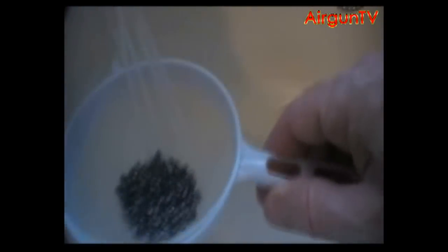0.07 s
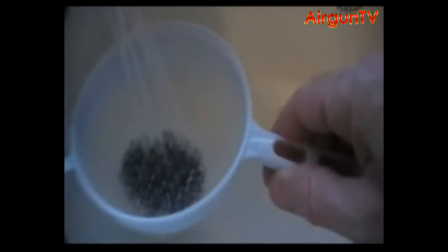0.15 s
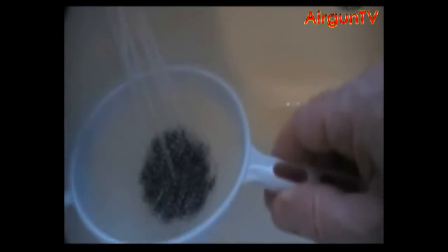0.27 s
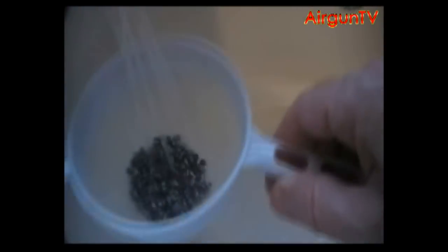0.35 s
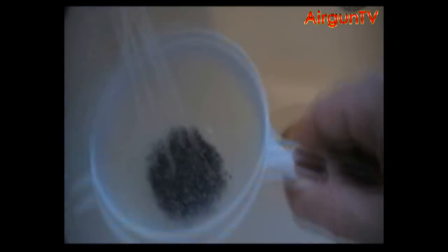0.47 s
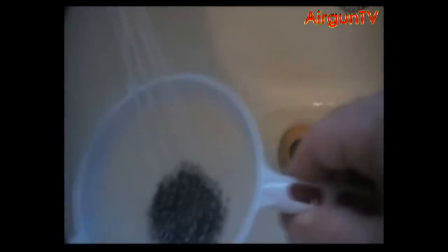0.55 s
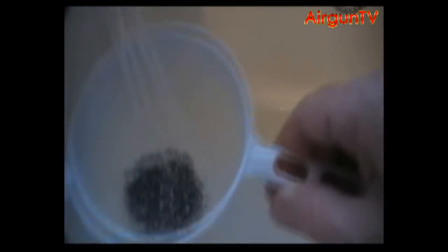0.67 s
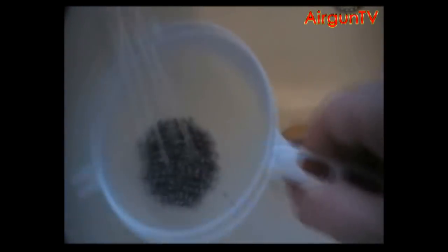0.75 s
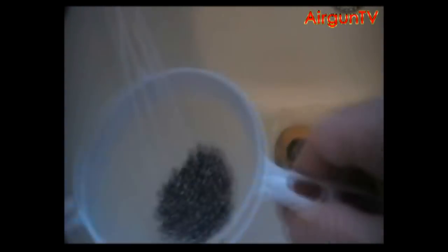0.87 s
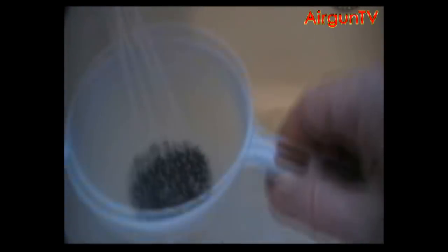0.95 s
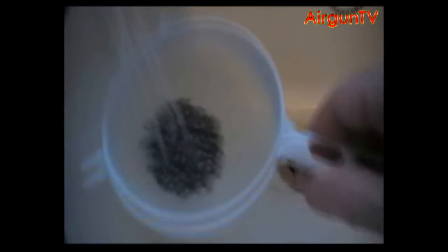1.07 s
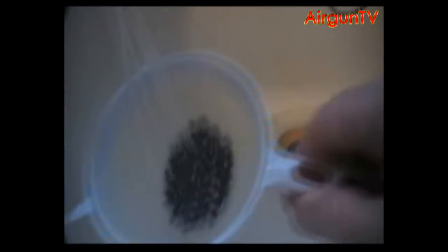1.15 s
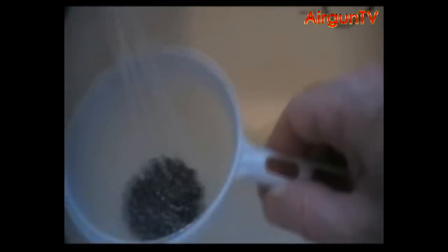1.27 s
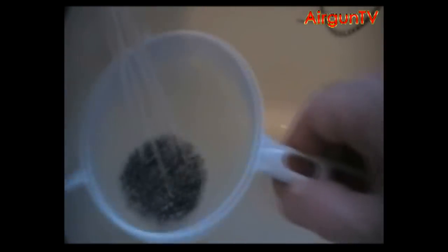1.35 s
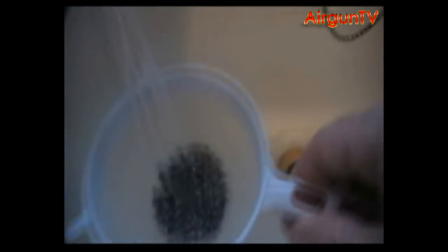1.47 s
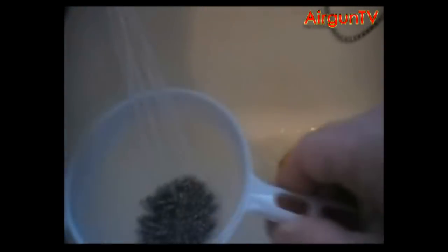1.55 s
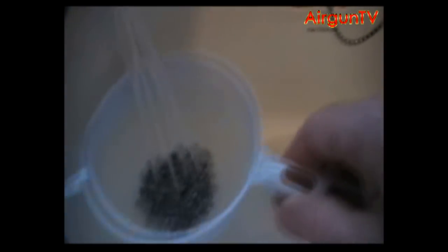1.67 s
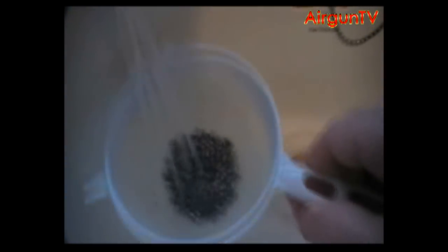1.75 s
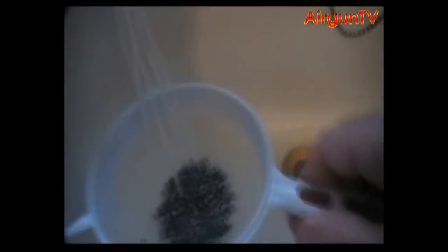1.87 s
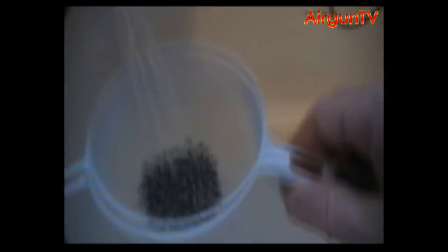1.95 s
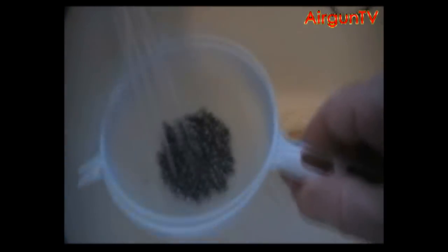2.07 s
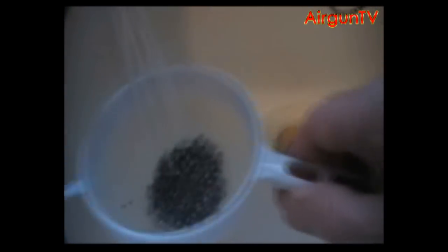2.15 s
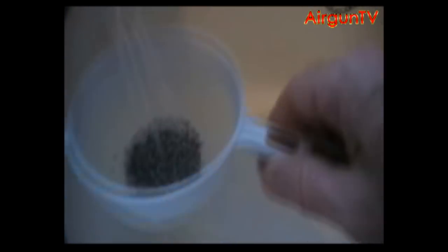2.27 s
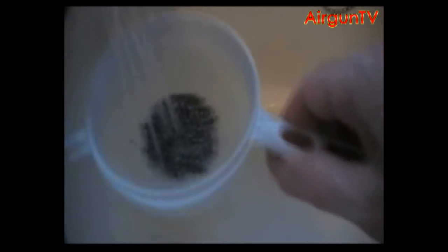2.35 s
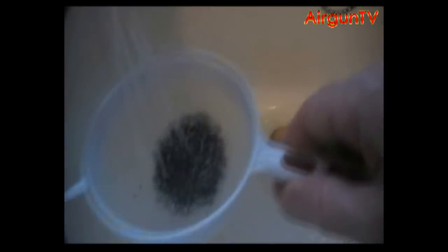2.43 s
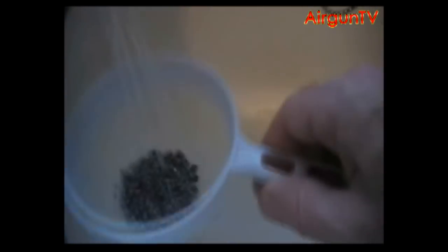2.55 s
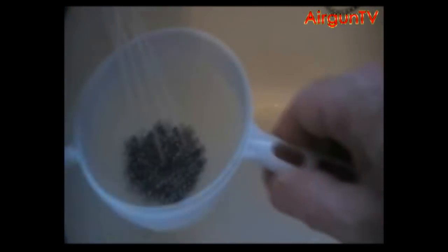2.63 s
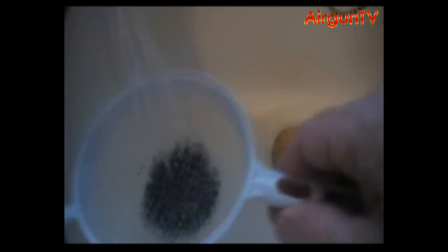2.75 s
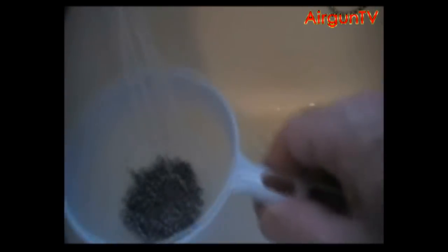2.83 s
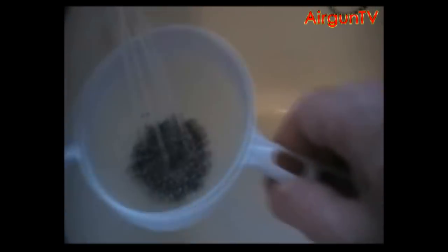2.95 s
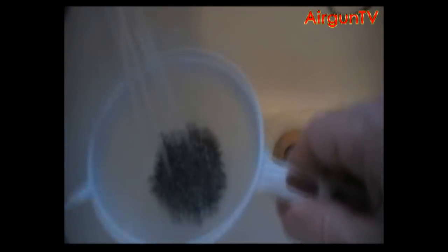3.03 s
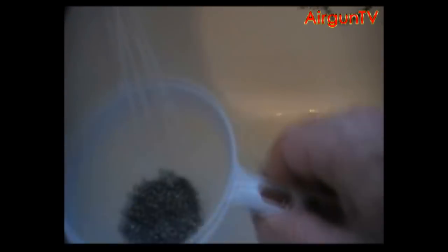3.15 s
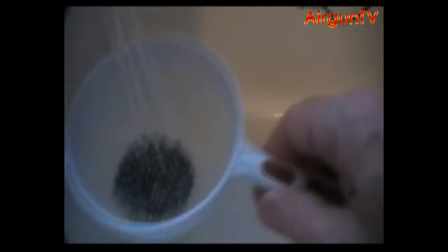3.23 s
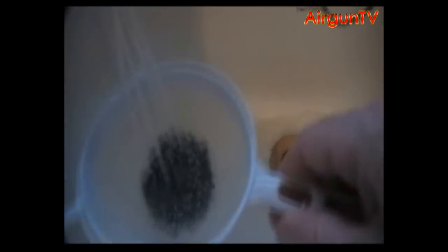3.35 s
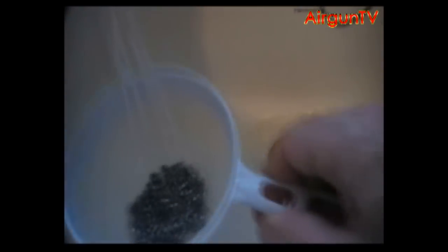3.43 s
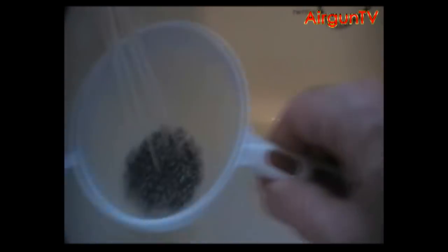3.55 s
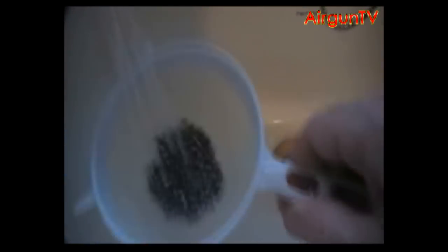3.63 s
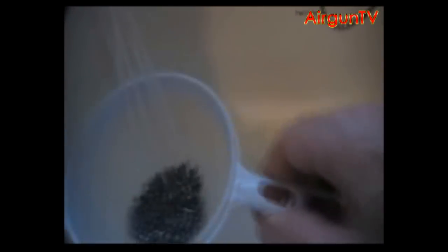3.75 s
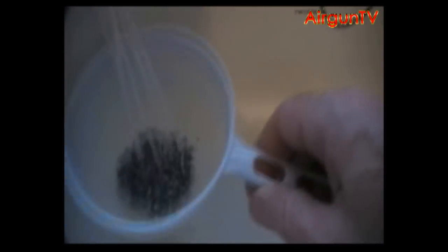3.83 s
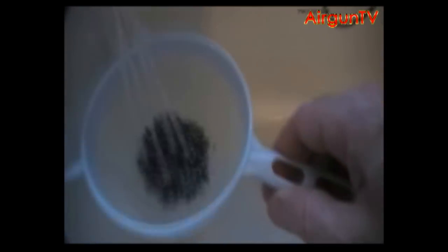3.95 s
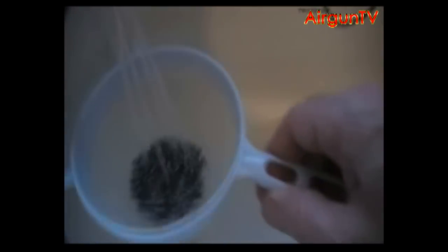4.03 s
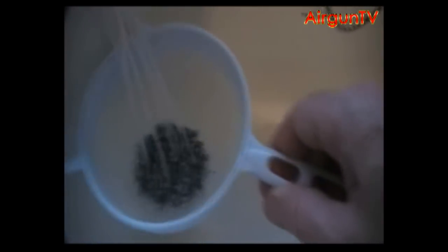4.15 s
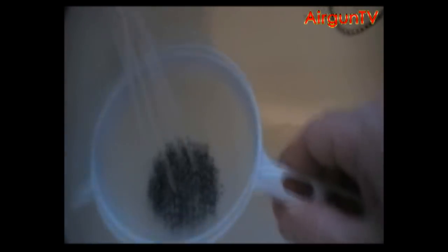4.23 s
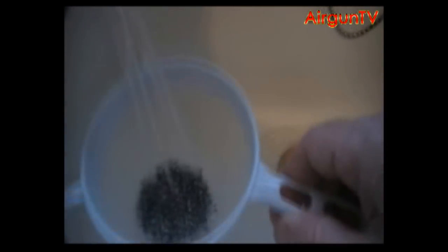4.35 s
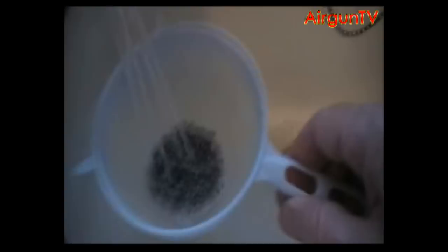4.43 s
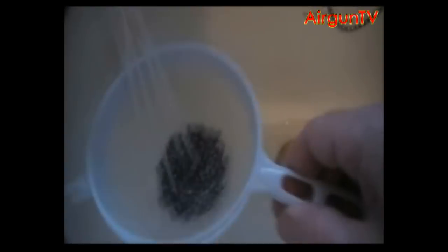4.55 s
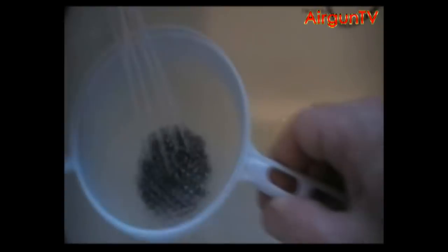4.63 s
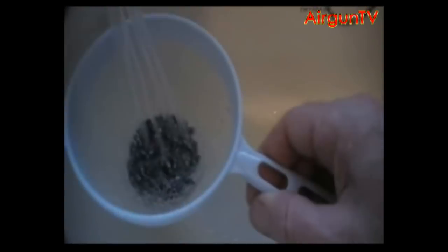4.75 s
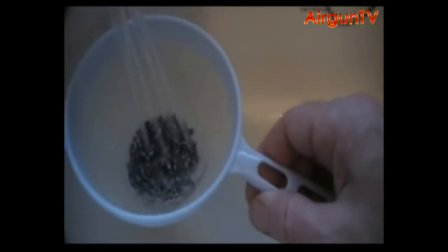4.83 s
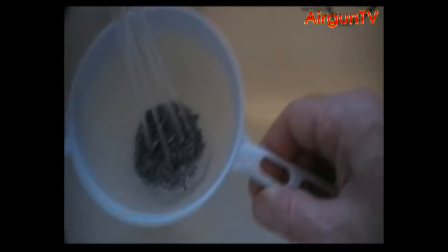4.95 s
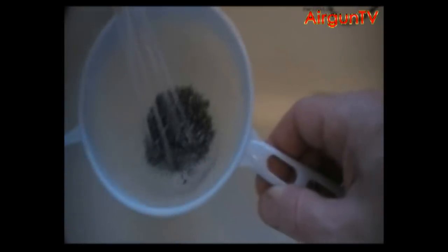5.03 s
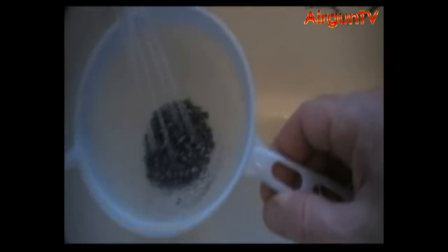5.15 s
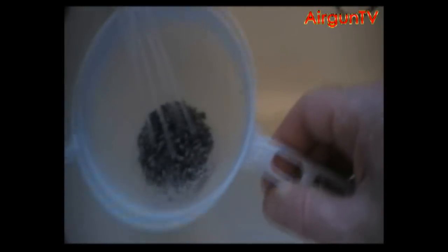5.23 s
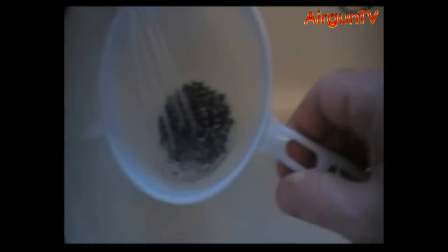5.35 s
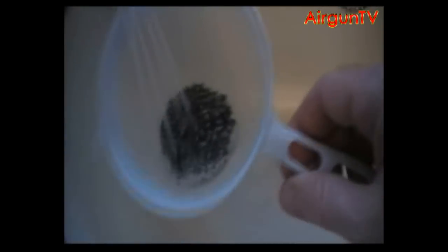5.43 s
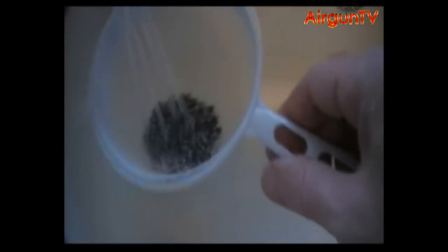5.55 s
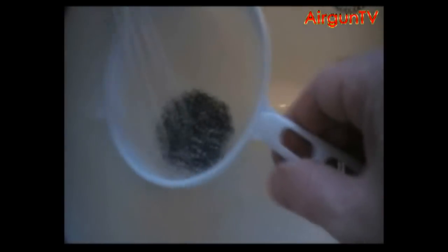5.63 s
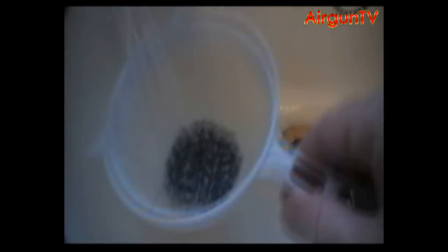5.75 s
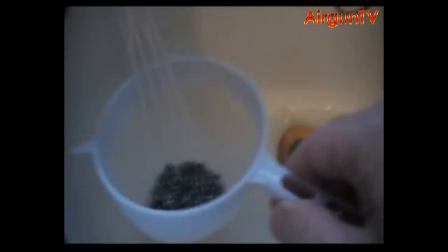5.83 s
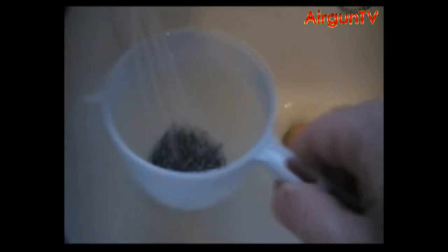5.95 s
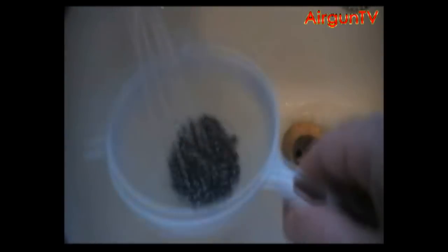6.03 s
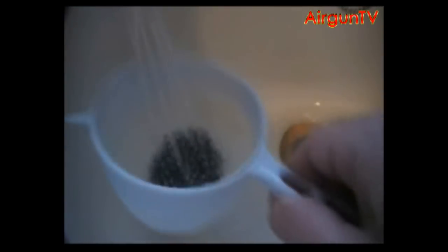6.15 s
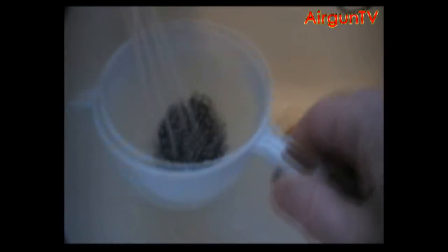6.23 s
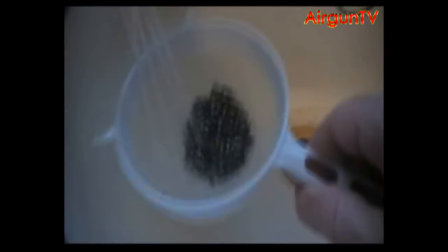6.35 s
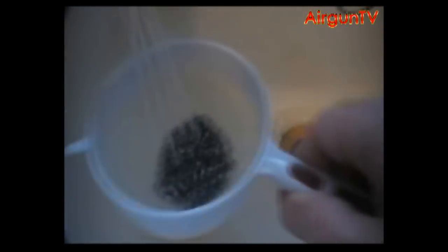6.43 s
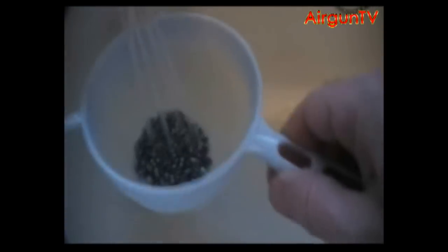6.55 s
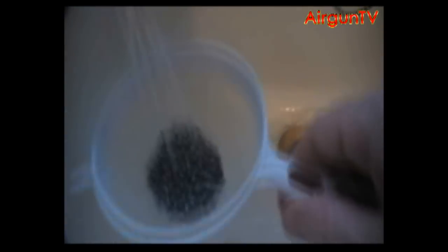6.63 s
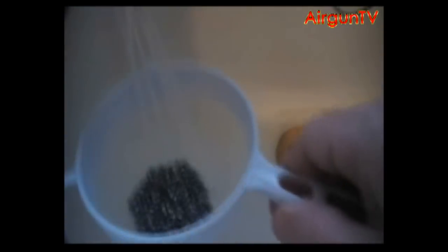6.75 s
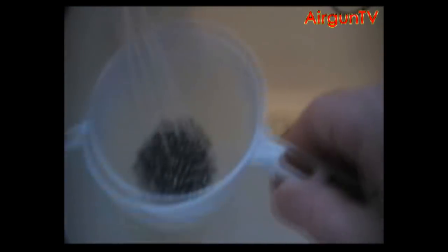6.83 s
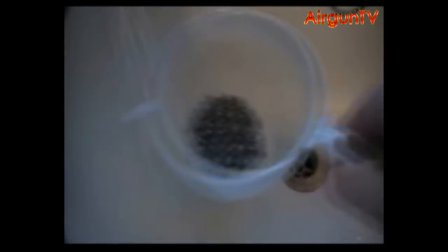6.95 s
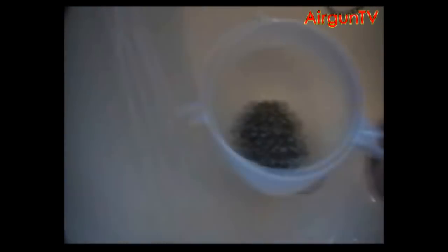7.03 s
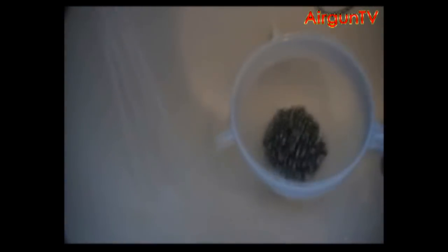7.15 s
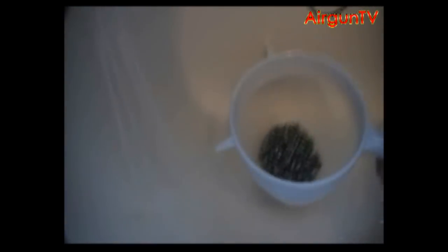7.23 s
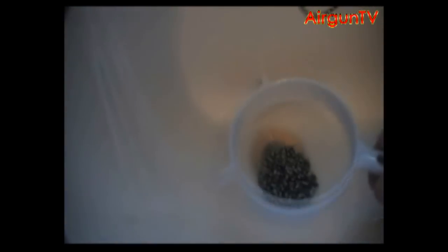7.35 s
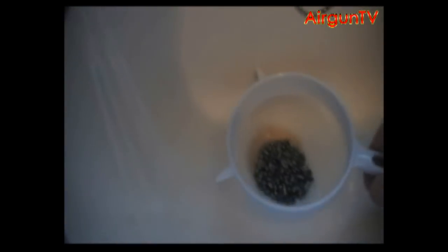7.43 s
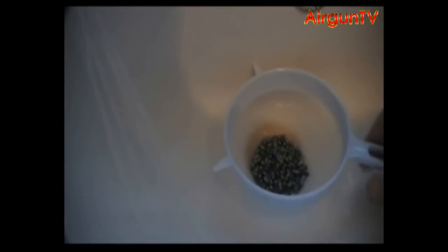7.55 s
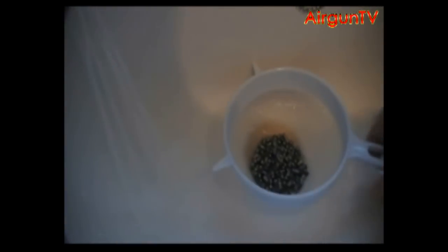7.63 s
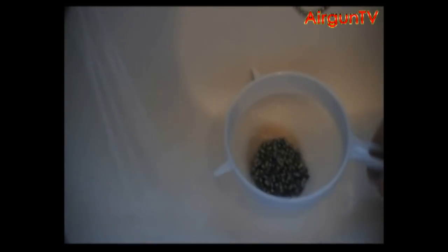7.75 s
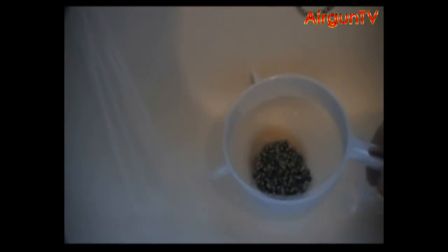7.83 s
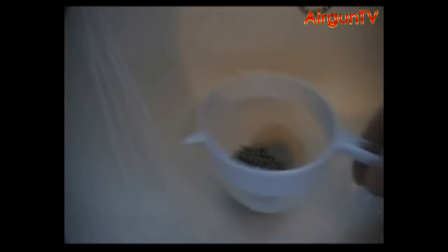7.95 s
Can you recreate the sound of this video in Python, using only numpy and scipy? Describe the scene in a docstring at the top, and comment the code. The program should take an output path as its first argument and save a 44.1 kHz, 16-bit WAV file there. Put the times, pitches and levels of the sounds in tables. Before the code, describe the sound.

Loud, bright, slightly overloaded stereo sound from a small camera held near the sink: pellets rattle in a sieve under running water in irregular rapid swells, with constant hiss, snapping droplets and occasional bubbly plops. The basin adds short hollow resonance over faint low room rumble and hum. In the last second the rattling drops away, leaving quieter run-off, separate ticks and small splashes.

```python
"""A bright spray of tap water on plastic pellets is heard first, in a sieve that a hand shakes over a basin.
Each shake tumbles the pellets: knocks, fizz and mist are dense impact noise, filtered and swelling together.
Single drops crack as short noise bands, air pockets plop as dying tones and basin resonances gurgle.
Near the end the sieve leaves the jet and spurts of run-off remain, over a low room wash with a faint hum."""
import sys
import numpy as np
from scipy import signal
from scipy.fft import rfft, irfft, next_fast_len
from scipy.io import wavfile
from scipy.ndimage import uniform_filter1d

SR = 44100
rng = np.random.default_rng(int(sys.argv[2]) if len(sys.argv) > 2 else 0)


def master_out(mix):
    """Clip the mix to full scale and print it as 16-bit PCM to the path in sys.argv[1]."""
    frames = np.transpose(np.atleast_2d(mix))
    ceiling = np.clip(frames, -1, 1)
    pcm = np.round(ceiling * 32767).astype(np.int16)
    wavfile.write(sys.argv[1], SR, pcm)


N = 352359  # samples

# spectrum of the pellet knocks: (frequency [Hz], density [dB per Hz])
PELLET_SPECTRUM = [(30, -81), (150, -21), (300, -13.5), (600, -10), (900, -2.5), (1500, 1), (2500, -0.5),
                   (4000, 0.5), (6000, 3.5), (8000, -5), (11000, -25)]


def pellets():
    """Impact noise: pellets knock each other and the mesh in a dense train of short, damped pulses."""
    knocks = grains(per_s=6000, spread_db=-0.5, lo_hz=396, hi_hz=8800, cycles=1.71, count=9)
    knocks = knocks * flicker(57, depth_db=0.5)
    return gain_of(shaken(order=1)) * coloured(knocks, PELLET_SPECTRUM)


# the jet between surges: (time [s], rattle level [dB], spray level [dB], mist level [dB])
JET_LEVELS = [(0, -26.5, -26.5, -36), (.5, -35, -28.5, -37.5), (.75, -35.5, -30, -40), (1, -31, -33, -39),
              (1.42, -35, -33, -41), (1.72, -32, -27, -34), (2.2, -26.5, -24, -35), (2.87, -31, -32, -37.5),
              (2.97, -43, -24.5, -34), (3.2, -37, -30, -36), (3.6, -32, -28.5, -35),
              (4.4, -31, -23.5, -33.5), (5.15, -30, -23.5, -28), (5.45, -35, -23.5, -32),
              (5.75, -27.5, -23.5, -30.5), (5.93, -38, -27.5, -37), (6.05, -31.5, -20.5, -32),
              (6.95, -32, -26, -34), (7.08, -43, -42, -40.5), (7.28, -40, -40, -36),
              (7.35, -40.5, -36, -36.5), (7.7, -43.5, -39.5, -34.5), (7.99, -46.5, -33, -34)]
# shakes of the hand, and after 7 s spurts of run-off:
# (peak time [s], length [s], rattle peak [dB], spray peak [dB])
SHAKES = [(0.088, 0.078, -15.5, -18.5), (0.196, 0.12, -21, -24), (0.278, 0.11, -17.5, -16),
          (0.404, 0.11, -18, -20), (0.57, 0.14, -25.5, -20.5), (0.677, 0.13, -18.5, -34),
          (0.854, 0.44, -19.5, -18), (.97, 0.36, -22, -21.5), (1.079, 0.45, -21.5, -18.5),
          (1.205, 0.28, -18.5, -20), (1.34, 0.15, -19, -18), (1.526, 0.32, -20.5, -20.5),
          (1.835, 0.12, -20, -21), (1.985, 0.12, -18.5, -17.5), (2.129, 0.093, -16.5, -17.5),
          (2.355, 0.43, -26, -19.5), (2.459, 0.084, -19.5, -19), (2.613, 0.19, -18.5, -17.5),
          (2.76, 0.15, -18, -19), (2.922, 0.16, -22, -25.5), (3.105, 0.2, -21.5, -26),
          (3.248, 0.092, -15, -19), (3.359, 0.51, -20.5, -20.5), (3.49, 0.062, -18, -18),
          (3.708, 0.37, -21.5, -20), (3.79, 0.15, -25.5, -22.5), (3.878, 0.071, -15, -18),
          (3.979, 0.19, -19.5, -17), (4.126, 0.18, -19.5, -19), (4.327, 0.34, -34.5, -22.5),
          (4.58, 0.091, -18, -19.5), (4.699, 0.18, -21.5, -21.5), (4.924, 0.11, -33, -27),
          (5.23, 0.42, -36, -21), (5.319, 0.08, -13, -26), (5.823, 0.13, -20.5, -17.5),
          (5.945, 0.12, -27, -41), (6.082, 0.16, -17, -21.5), (6.243, 0.35, -23.5, -24.5),
          (6.418, 0.11, -20, -19.5), (6.548, 0.088, -16.5, -17), (6.674, 0.16, -20, -23),
          (6.821, 0.098, -18, -33), (6.923, 0.048, -30, -18), (6.998, 0.11, -29, -22.5),
          (7.134, 0.093, -48, -31.5), (7.183, 0.11, -34, -26.5), (7.294, 0.059, -28.5, -30),
          (7.431, 0.086, -28, -23), (7.496, .07, -31, -29), (7.589, 0.039, -29, -36),
          (7.791, 0.047, -36, -40), (7.921, 0.068, -25.5, -21), (7.99, .05, -45, -36)]
RISE_SHARE = 0.41  # part of a surge before its peak
SLOPE_DB = 16  # fall of level over one whole rise or decay, beyond the rounded top
ROUNDING = 0.11  # part of a rise or decay over which the top is rounded


def shaken(order):
    """Addition of powers: level [dB] of pellets (order 1) or spray (order 2), steady jet plus each surge."""
    t = np.arange(N) / SR
    power = gain_of(2 * curve(JET_LEVELS, order))
    for s, length, *peak_db in SHAKES:
        near = slice(max(round((s - length) * SR), 0), round((s + 2 * length) * SR))
        before = (s - t[near]) / RISE_SHARE
        after = (t[near] - s) / (1 - RISE_SHARE)
        away = np.maximum(before, after) / length  # 1 at either end of the surge
        drop_db = SLOPE_DB * (np.hypot(away, ROUNDING) - ROUNDING)
        power[near] += gain_of(2 * (peak_db[order - 1] - drop_db))
    return 10 * np.log10(power)


# spectra of the fizz with its ticks, and of the larger splashes: (frequency [Hz], density [dB per Hz])
SPRAY_SPECTRUM = [(100, -49), (1000, -15.5), (2500, -16), (4200, -3.5), (5200, -0.5), (6500, 7),
                  (8000, 0.5), (10000, -8), (13000, -29.5)]
SPLASH_SPECTRUM = [(300, -49), (1200, -20), (2000, -11.5), (2900, -4), (3800, -2), (4800, -0.5),
                   (7000, -35.5)]
BODY_DB = -9  # larger droplets give the spray a body near 3.5 kHz; level against the spray


def spray():
    """Superposed impacts: droplets burst on mesh, pellets and basin as fizz, larger splashes and sharp ticks."""
    fizz = grains(per_s=5000, spread_db=3.0, lo_hz=3000, hi_hz=11340, cycles=4.15, count=8)
    fizz = fizz * flicker(83, depth_db=1.0)
    ticks = grains(per_s=350, spread_db=5, lo_hz=4000, hi_hz=10100, cycles=1.8, count=4)
    splash = grains(per_s=1500, spread_db=2.5, lo_hz=1500, hi_hz=5000, cycles=4.5, count=6)
    body = gain_of(BODY_DB) * flicker(3.3, depth_db=0.96) * coloured(splash, SPLASH_SPECTRUM)
    level_db = shaken(order=2)
    tick_share = np.clip(0.14 + 0.11 * (-28.5 - level_db), .1, .6)  # a thin spray has more separate ticks
    droplets = np.sqrt(1 - tick_share) * fizz + np.sqrt(tick_share) * ticks
    return gain_of(level_db) * (coloured(droplets, SPRAY_SPECTRUM) + body)


# spectrum of the mist: (frequency [Hz], density [dB per Hz])
MIST_SPECTRUM = [(1000, -80), (5000, -32), (8000, 3.5), (10000, 0), (12000, -5), (14000, -7.5),
                 (15500, -26)]
SIEVE_LEAVES_S = 6.2  # when the sieve leaves the jet
TICKS_UNDER, TICKS_CLEAR = .022, .2  # power share of separate ticks before and after that
MIST_FOLLOWS = .55  # dB gained per dB of spray above the jet


def mist():
    """Impact density: the finest droplets fuse to a thin hiss, and land more singly once the sieve is clear."""
    fizz = grains(per_s=9600, spread_db=3.5, lo_hz=6000, hi_hz=14800, cycles=2.6, count=5)
    fizz = fizz * flicker(23, depth_db=2.0)
    ticks = grains(per_s=400, spread_db=7.0, lo_hz=7000, hi_hz=14000, cycles=2.2, count=4)
    tick_share = np.where(np.arange(N) < SIEVE_LEAVES_S * SR, TICKS_UNDER, TICKS_CLEAR)
    surge_db = shaken(order=2) - curve(JET_LEVELS, order=2)
    level_db = curve(JET_LEVELS, order=3) + MIST_FOLLOWS * surge_db
    droplets = np.sqrt(1 - tick_share) * fizz + np.sqrt(tick_share) * ticks
    return gain_of(level_db) * coloured(droplets, MIST_SPECTRUM)


# single loud drops: (onset time [s], peak level [dB], lower band edge [Hz], upper band edge [Hz])
DROPS = [(.185, 0, 4100, 6600), (0.351, -4.5, 4400, 9100), (0.4308, -6, 4300, 7000), (.488, -5, 5300, 7200),
         (.5433, -7, 4700, 7000), (.7875, -6, 5300, 6750), (1.2612, -0.5, 3780, 6400),
         (1.619, -6, 2880, 6900), (1.656, -6, 4870, 6600), (1.6754, -5, 4040, 6460),
         (1.937, -5, 4500, 6500), (2.268, -1.5, 3330, 6800), (2.2992, -7, 5900, 7600),
         (2.6848, -2, 5800, 7550), (2.8413, -1, 4000, 6700), (2.9817, -6, 4720, 8800),
         (3.012, -6, 6000, 7650), (3.3554, -2, 5670, 7260), (3.564, -8, 3900, 7100),
         (3.905, 0.5, 3400, 7000), (4.288, -9, 5500, 7200), (4.317, -4, 4000, 7400),
         (4.4348, -4, 3700, 10400), (4.4714, -4, 5900, 7600), (4.4886, -1.5, 4230, 7100),
         (4.5282, -6, 5600, 7300), (4.639, -6, 3900, 5900), (4.6498, -7, 3100, 3900),
         (4.808, -5, 6000, 7800), (4.8602, -12, 2640, 3400), (4.9826, -3, 5240, 6560),
         (5.0392, -4.5, 4900, 6500), (5.2283, -6, 4900, 6350), (5.418, -4.5, 5000, 7200),
         (5.533, -8, 5450, 7340), (5.549, -9.5, 2500, 4400), (5.555, 0, 5800, 8650),
         (5.5645, -1, 6000, 7900), (5.6774, -8, 6400, 8300), (5.8009, 0, 6400, 8300),
         (5.868, -5, 3870, 7100), (6.467, 1.5, 3160, 7000), (6.486, -7, 5600, 7300),
         (6.729, -5.5, 3500, 8500), (6.8596, -3, 6150, 8600), (6.9114, -8, 4200, 7000),
         (6.968, -5.5, 5600, 7400), (7.0974, -8, 5600, 7800), (7.1183, -11, 6000, 9700),
         (7.125, -2, 6200, 9500), (7.1315, -6, 6600, 8900), (7.1766, -4, 5050, 12000),
         (7.1881, 0, 1110, 9000), (7.2075, -12, 4000, 5500), (7.218, -0.5, 6000, 7850),
         (7.2646, -4.5, 6360, 8240), (7.2752, -6, 5500, 10900), (7.308, -4.5, 1090, 5900),
         (7.3153, -2, 3400, 6500), (7.36, -14, 5000, 11600), (7.43, -16, 5000, 8000),
         (7.501, -17, 3600, 6100), (7.579, -1, 403, 8700), (7.595, -13, 3000, 7700),
         (7.6801, -15, 8400, 10900), (7.692, -19.5, 1500, 3500), (7.6944, -12, 5900, 9300),
         (7.729, -5, 5830, 7600), (7.753, -11, 5900, 11400), (7.8214, -14, 10900, 14200),
         (7.8455, -16, 4500, 9800), (7.857, -12, 5730, 9600), (7.884, -15, 4800, 9700),
         (7.901, -6, 4000, 10900), (7.9164, -24, 700, 6900), (7.9212, -12, 3000, 7500),
         (7.933, -4, 5270, 6600), (7.978, -11, 5800, 7500), (7.9819, -7, 4930, 10000)]


def drops():
    """Transient radiation: each drop cracks in its own frequency band."""
    out = np.zeros(N)
    for s, db, lo_hz, hi_hz in DROPS:
        add(out, s, gain_of(db) * burst(lo_hz, hi_hz))
    return out


def burst(lo_hz, hi_hz):
    """Band-limited impulse: a click on about a millisecond of noise with a faint tail, peak 1."""
    t = np.arange(700) / SR
    shape = t / 0.00014 * np.exp(-t / 0.00061) + 0.018 * np.exp(-t / .004)
    click = 4 * (np.arange(len(t)) == 12)
    push = shape * rng.standard_normal(len(t)) + click
    band = signal.butter(2, [lo_hz, hi_hz], "bandpass", fs=SR, output="sos")
    ring = signal.sosfilt(band, push)
    return ring / abs(ring).max()


# trapped air pockets: (onset time [s], level before decay [dB], starting pitch [Hz], 60 dB decay time [s])
PLOPS = [(2.414, -27.5, 616, 0.16), (3.097, -19, 750, 0.029), (4.02, -23.5, 830, 0.084),
         (4.351, -21.5, 760, 0.043), (4.777, -26, 620, 0.041), (4.859, -22, 751, 0.053),
         (5.19, -25, 1103, 0.15), (5.297, -27, 433, 0.046), (5.322, -25, 520, 0.06),
         (5.424, -36, 450, 0.05), (5.45, -30.5, 1083, 0.15), (5.82, -26, 420, 0.03),
         (5.688, -21.5, 1090, 0.079), (6.04, -15, 924, 0.053), (6.105, -25, 836, 0.074),
         (6.681, -3.5, 882, 0.037), (7.005, -16, 902, 0.03), (7.007, -16, 1320, 0.025),
         (7.225, -35, 610, 0.052), (7.034, -28, 827, 0.12), (7.282, -9, 852, 0.036),
         (7.414, -31, 725, 0.074), (7.631, -37, 626, 0.06), (7.772, -36, 654, 0.06),
         (7.66, -37, 1130, 0.07), (7.912, -25, 663, 0.13)]


def plops():
    """Bubble resonance: each air pocket rings as a quickly dying tone that rises a little."""
    out = np.zeros(N)
    t = np.arange(6000) / SR
    onset = 1 - np.exp(-t / 0.0011)
    for s, db, hz, t60 in PLOPS:
        tone = np.sin(2 * np.pi * hz * (t + 0.35 * t ** 2))
        add(out, s, gain_of(db - 60 * t / t60) * onset * tone)
    return out


def echoed(x):
    """Early reflection: short scatter off the basin walls, with other echoes for each side."""
    t = np.arange(3000) / SR
    sparse = rng.choice([-1., 1.], (2, len(t))) * (rng.random((2, len(t))) < .05)
    taps = sparse * gain_of(-60 * t / 0.081) * (t > .001)
    scatter = signal.oaconvolve(x[None], taps / np.linalg.norm(taps[0]), axes=1)[:, :N]
    return x + gain_of(-11) * scatter


# hollow tones of the basin, low to high: (frequency [Hz], bandwidth of one resonator pass [Hz])
BASIN_TONES = [(655, 98), (860, 120), (1080, 132)]
# their levels between surges: (time [s], low tone [dB], middle tone [dB], high tone [dB])
GURGLE_LEVELS = [(0, -56, -54, -50), (1, -54, -55, -46), (1.7, -60.5, -57, -46.5), (2.45, -51, -58, -43),
                 (3, -69, -59, -51.5), (3.4, -56, -51, -46), (4.2, -54, -46.5, -44.5), (4.4, -51, -45, -44),
                 (4.58, -60, -54, -52), (4.8, -47.5, -47, -42), (5.2, -44, -40, -41), (5.33, -57, -49, -52),
                 (5.42, -59, -48, -41), (5.56, -54, -49, -39), (5.65, -57, -44, -43), (5.9, -56, -48, -53),
                 (6.09, -54, -39, -40), (6.25, -63.5, -53, -49), (6.83, -54, -51, -44.5),
                 (7.1, -56, -54, -61), (7.36, -57, -51, -60), (7.43, -48.5, -49, -64),
                 (7.55, -50, -61, -58), (7.7, -47, -63, -56), (7.84, -60, -72, -64),
                 (7.99, -45.5, -55, -55)]
GURGLE_FOLLOWS = .55  # dB gained per dB of rattle above the jet


def gurgle():
    """Resonance: dense small splats set the hollow tones of the basin ringing."""
    out = np.zeros((2, N))
    surge_db = GURGLE_FOLLOWS * (shaken(order=1) - curve(JET_LEVELS, order=1))
    for k, (hz, width) in enumerate(BASIN_TONES):
        landed = rng.random((2, N)) < 800 / SR  # 800 splats a second on average
        splats = rng.standard_normal((2, N)) * landed * flicker(9.9, depth_db=3.5)
        b, a = signal.iirpeak(hz, hz / width, SR)
        ringing = signal.lfilter(b, a, signal.lfilter(b, a, splats))
        out += gain_of(curve(GURGLE_LEVELS, k + 1) + surge_db) * evened(ringing)
    return out


# spectrum of the room wash: (frequency [Hz], density [dB per Hz])
ROOM_SPECTRUM = [(20, -16), (50, -16.5), (86, -5), (162, -10), (356, -6), (493, -9.5), (700, -4.5),
                 (1120, -15), (1950, -48), (3300, -103)]
# level at which the low wash is heard: (time [s], level [dB])
ROOM_LEVELS = [(0, -52), (1.8, -53.5), (2.1, -51), (4.8, -49.5), (5.2, -47.5), (5.6, -48), (7.99, -49.5)]
# steady tone: (frequency [Hz], peak level before its waver [dB])
HUM_TONES = [(80.7, -69)]


def room():
    """Background noise: a low wash of room and pipes, with a faint wavering hum."""
    t = np.arange(N) / SR
    hum = sum(gain_of(db) * np.sin(2 * np.pi * hz * t) for hz, db in HUM_TONES)
    wash = coloured(rng.standard_normal((2, N)), ROOM_SPECTRUM)
    return gain_of(curve(ROOM_LEVELS, order=1)) * wash + hum * flicker(3, depth_db=0.5)


def grains(per_s, spread_db, lo_hz, hi_hz, cycles, count):
    """Shot noise: short impacts of scattered pitch and size; two unrelated streams of unit level."""
    size, z = next_fast_len(N), 0
    for hz in np.geomspace(lo_hz, hi_hz, count):
        turns = np.arange(1, 200) * hz / SR
        shape = turns * np.exp(-4 * turns / cycles) * np.sin(2 * np.pi * turns)
        shape = np.sqrt(hz) * shape / np.linalg.norm(shape)
        chance = rng.uniform(-1, 1, (2, N)) * SR * count / per_s  # an impact wherever this falls within one
        hit = abs(chance) < 1
        rarity = np.minimum(-np.log(abs(chance[hit]) + 1e-9), 5)
        hits = np.zeros((2, N))
        hits[hit] = np.sign(chance[hit]) * gain_of(spread_db * rarity)
        z = z + rfft(hits, size) * rfft(shape, size)
    # flatten the long-term spectrum so that only the grain remains
    flat = z / np.sqrt(uniform_filter1d(abs(z) ** 2, 4000))
    return evened(irfft(flat, size)[:, :N])


def flicker(per_s, depth_db):
    """Amplitude modulation: a random level waver of about per_s bumps a second."""
    b, a = signal.butter(2, per_s, fs=SR)
    waver = evened(signal.lfilter(b, a, rng.standard_normal(N)))
    return gain_of(depth_db * waver)


def coloured(x, points):
    """Minimum-phase filtering: a causal filter of the given spectrum that passes white noise at unit level."""
    log_gain = np.log(gain_of(read(points, abs(np.fft.fftfreq(8192, 1 / SR)))))
    taps = np.fft.ifft(np.exp(np.conj(signal.hilbert(log_gain)))).real[:4096]
    return signal.oaconvolve(x, taps[None] / np.linalg.norm(taps), axes=-1)[:, :N]


def patchy(x, depth_db):
    """Time-varying filtering: the colour drifts at random in small patches of time and frequency."""
    z = signal.stft(x, nperseg=512)[2]
    patches = uniform_filter1d(rng.standard_normal(z.shape[1:]), size=6, axis=0)  # over frequency
    patches = uniform_filter1d(patches, size=12, axis=1)  # over time
    return signal.istft(z * gain_of(depth_db * evened(patches)), nperseg=512)[1][:, :N]


def gain_of(db):
    """Decibel law: amplitude ratio of a level."""
    return 10 ** (np.asarray(db) / 20)


def evened(x):
    """Normalization: scale to a root mean square of one."""
    return x / np.sqrt(np.mean(x ** 2) + 1e-20)


def read(points, hz):
    """Interpolation of a frequency table along a logarithmic axis."""
    f, value = np.transpose(points)
    return np.interp(np.log(hz + 1), np.log(f + 1), value)


def curve(rows, order):
    """Linear interpolation in time of the chosen column of a table."""
    rows = np.asarray(rows)
    return np.interp(np.arange(N) / SR, rows[:, 0], rows[:, order])


def add(mix, s, sound):
    """Superposition: add a sound into the mix from time s, cut at the end."""
    part = mix[..., round(s * SR):][..., :sound.shape[-1]]
    part += sound[..., :part.shape[-1]]


# likeness of the two sides in wide sources: (frequency [Hz], correlation [0 to 1])
LIKENESS = [(100, 0.49), (330, 0.57), (700, 0.97), (2700, 0.93), (6000, 0.93), (9000, 0.39), (14000, 0.52)]


def scene():
    """Coherence: wide sources reach the right port only partly alike; single events reach both, then scatter."""
    size = next_fast_len(N)
    water = patchy(pellets() + spray() + mist(), depth_db=1.52)
    left, other = rfft(water + gurgle() + room(), size)
    like = np.clip(read(LIKENESS, np.fft.rfftfreq(size, 1 / SR)), 0, 1)
    right = like * left + np.sqrt(1 - like ** 2) * other
    wide = irfft(np.array([left, right]), size)[:, :N]
    return wide + echoed(drops() + plops())


# level difference of the two microphone ports: (frequency [Hz], left minus right [dB])
PORT_BALANCE = [(100, -3), (330, -4), (770, -1.5), (2000, 0.5), (4200, -1.5), (6000, -6.5), (7300, -4.5),
                (8500, 3.5), (10000, 7.5), (15000, 0)]
# phase difference of the ports: (frequency [Hz], lead of left over right [rad])
PORT_LEAD = [(0, -2), (1290, 0.56), (1640, 0.44), (4050, 0), (5680, 0.82), (6630, 1.43), (7320, 2),
             (8530, 3.5), (9130, 4), (11000, 1.1), (12600, 0.5), (15300, 1)]
EDGE_HZ = 15700  # upper band limit


def record(dry):
    """Transfer function: each port has its own treble resonance; peaks clip; then the band is limited."""
    size = next_fast_len(N + 4096)
    hz = np.fft.rfftfreq(size, 1 / SR)
    port = gain_of(read(PORT_BALANCE, hz) / 2) * np.exp(.5j * read(PORT_LEAD, hz))  # half to each side
    ports = irfft(rfft(dry, size) * np.array([port, 1 / port]), size)[:, :N]
    heard = np.clip(ports, -.97, .97)
    lowpass = signal.firwin(511, EDGE_HZ, window=("kaiser", 9), fs=SR)
    return signal.oaconvolve(heard, lowpass[None], "same")


dry = scene()
out = record(dry)
master_out(out)
```